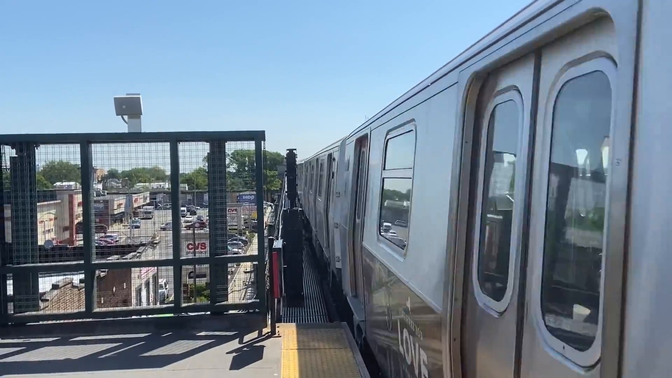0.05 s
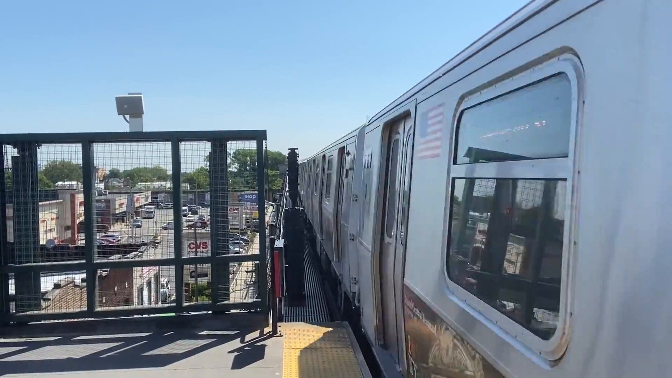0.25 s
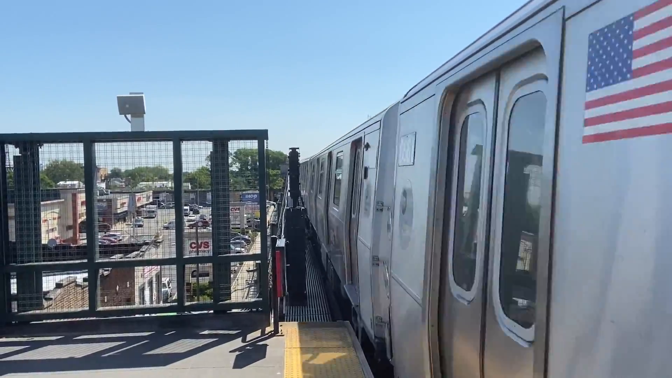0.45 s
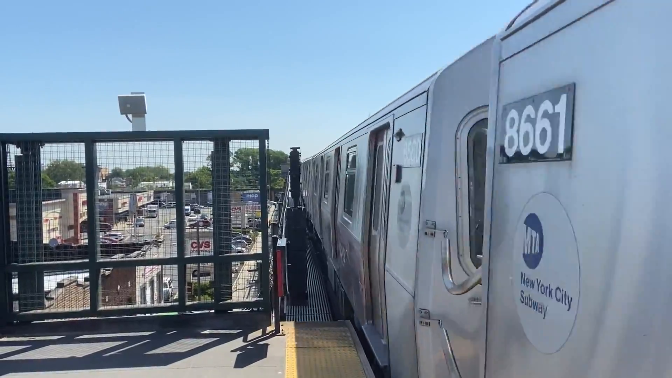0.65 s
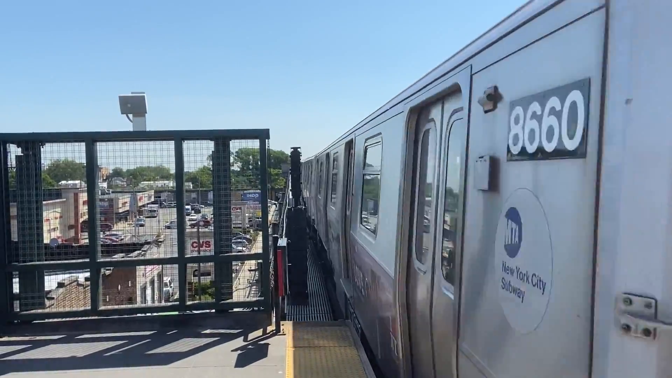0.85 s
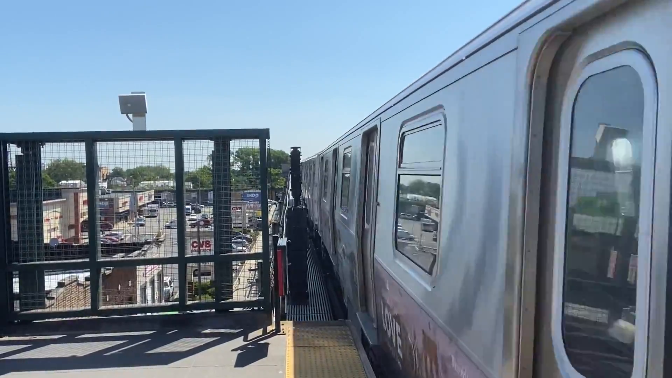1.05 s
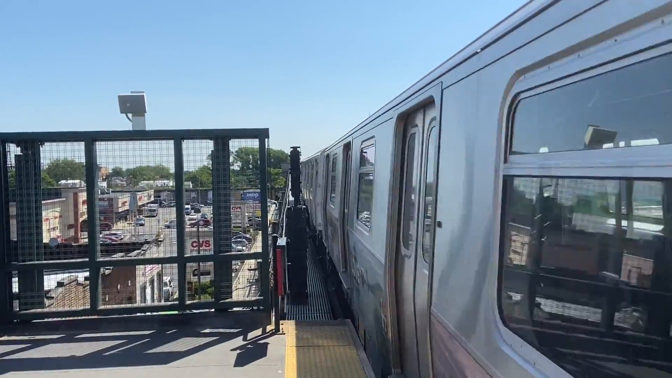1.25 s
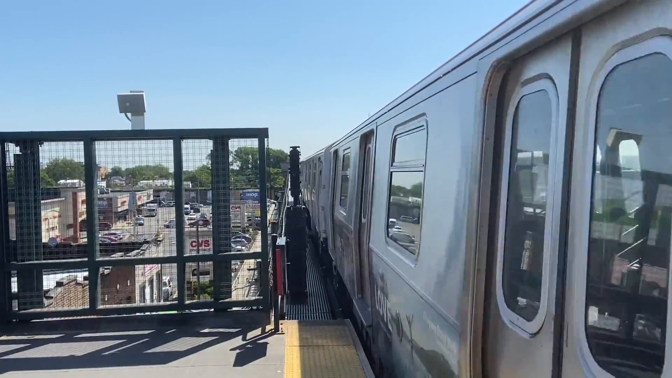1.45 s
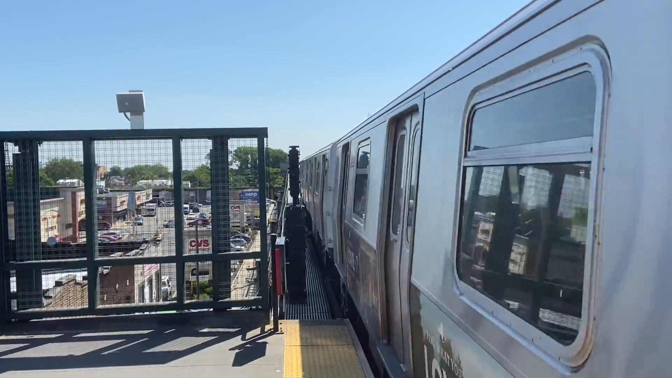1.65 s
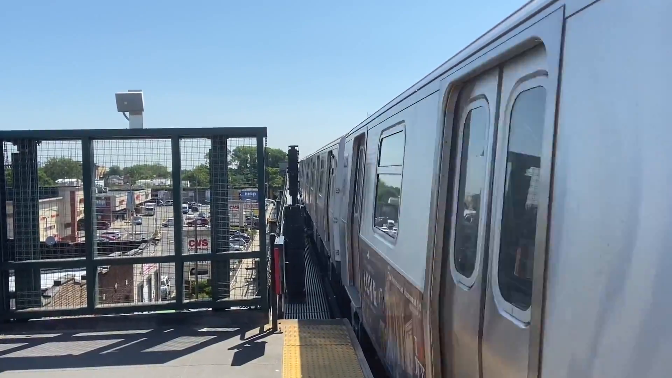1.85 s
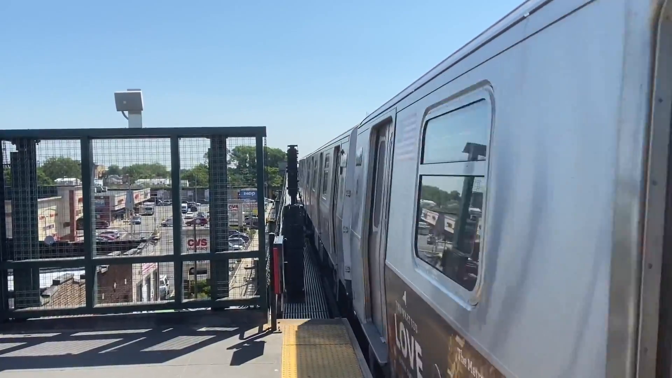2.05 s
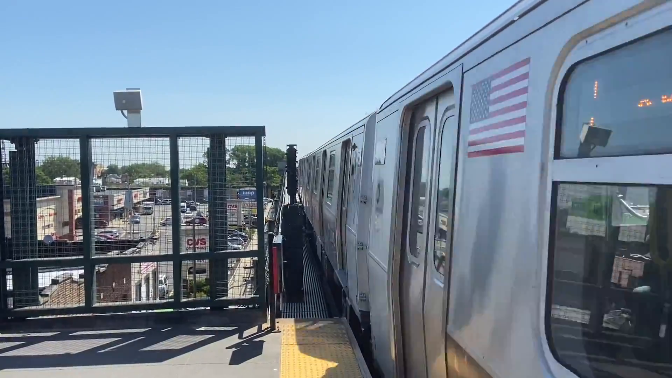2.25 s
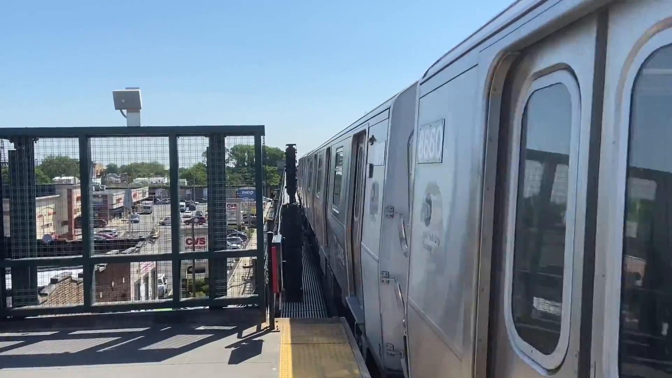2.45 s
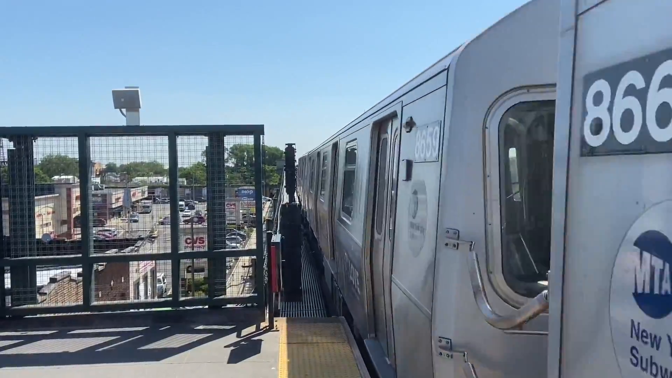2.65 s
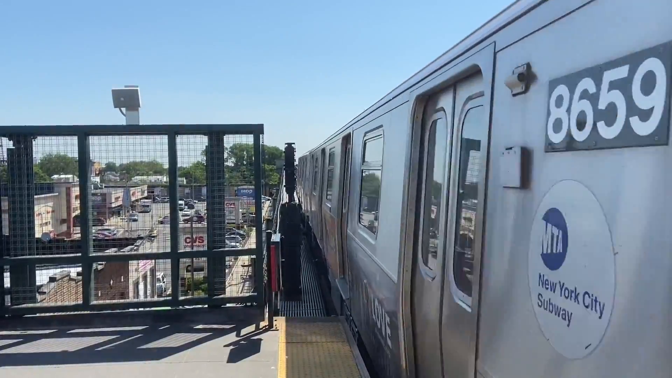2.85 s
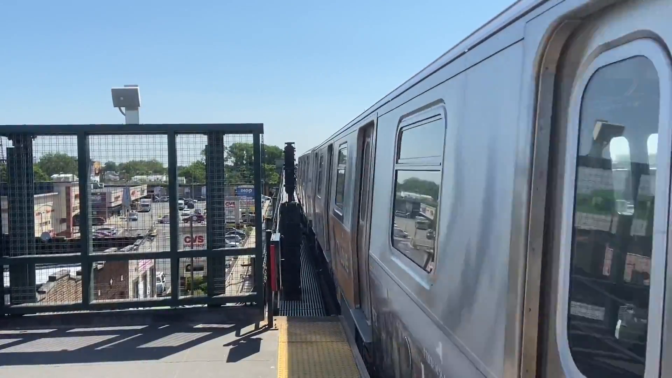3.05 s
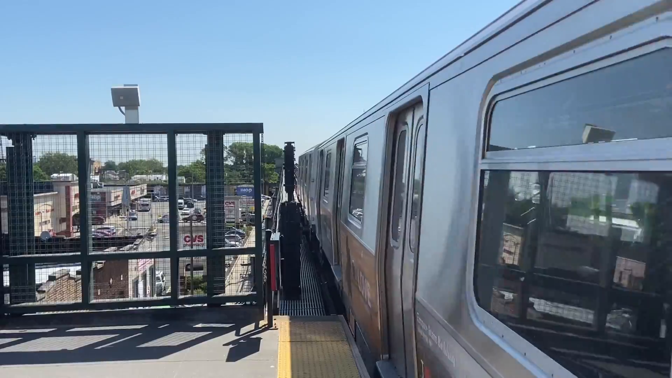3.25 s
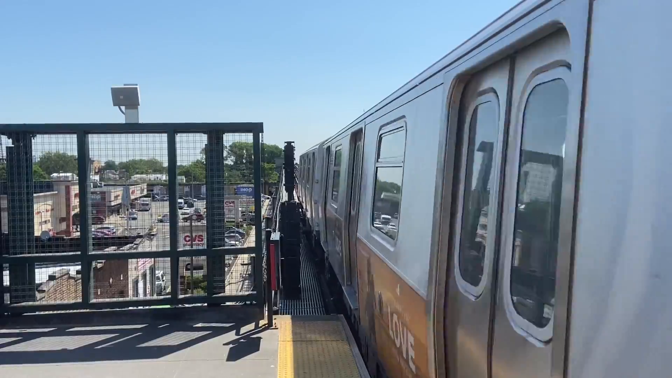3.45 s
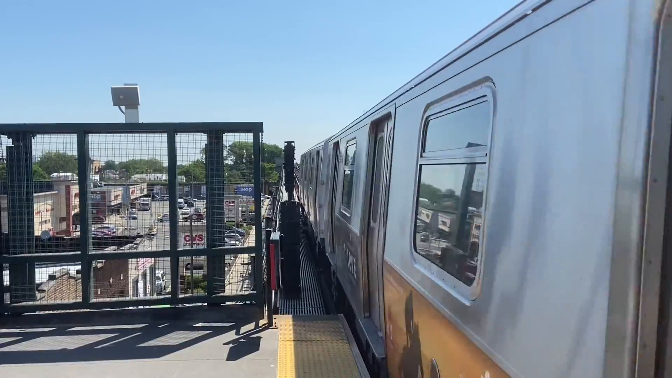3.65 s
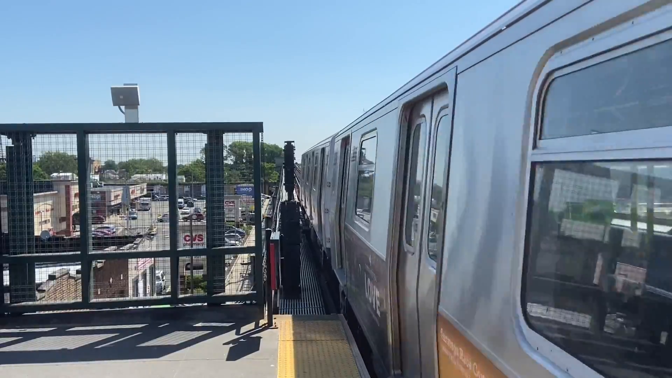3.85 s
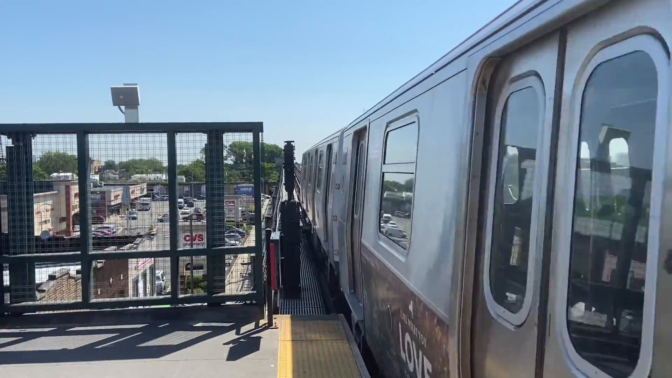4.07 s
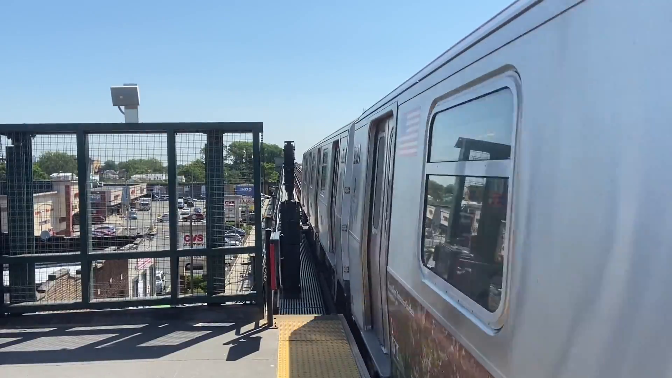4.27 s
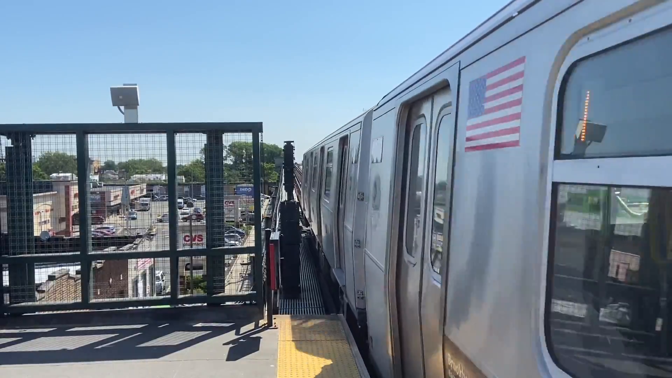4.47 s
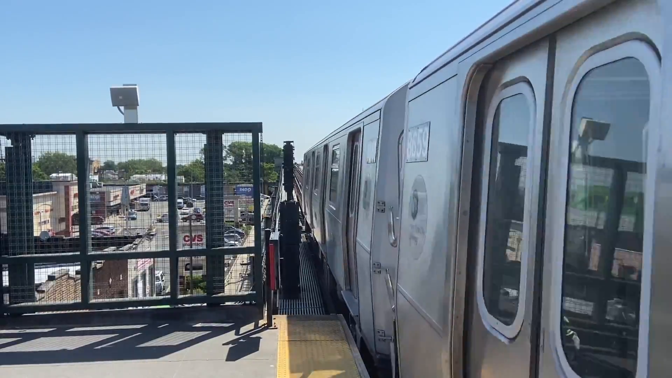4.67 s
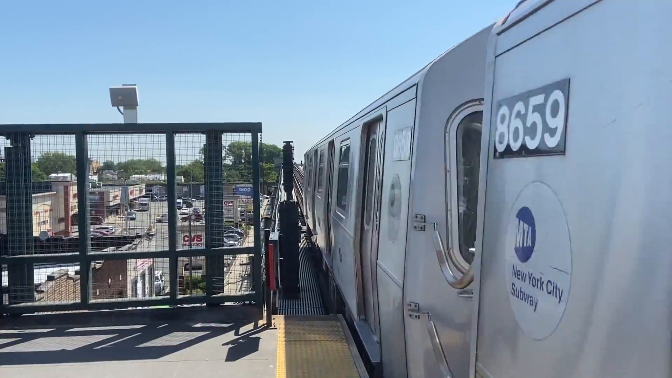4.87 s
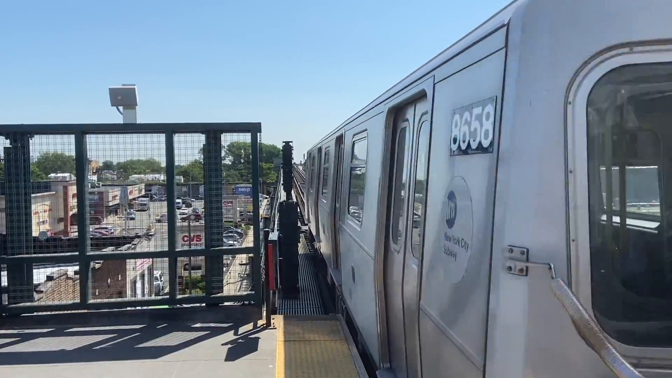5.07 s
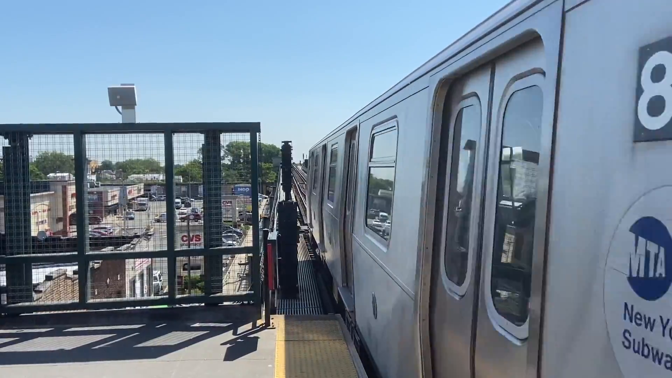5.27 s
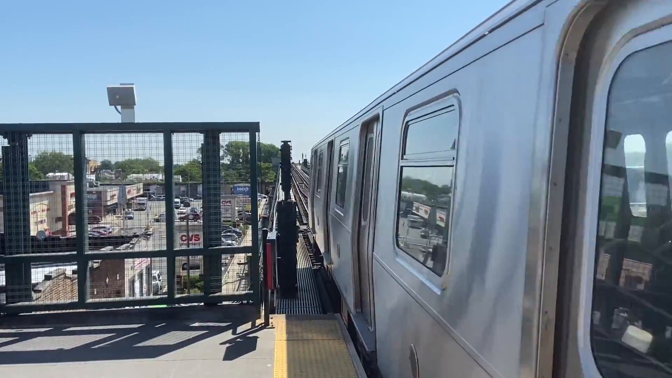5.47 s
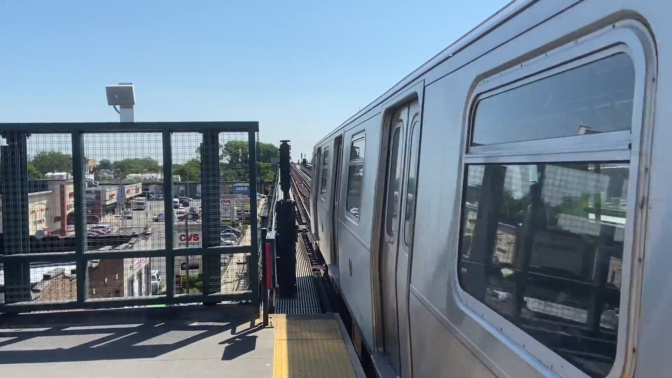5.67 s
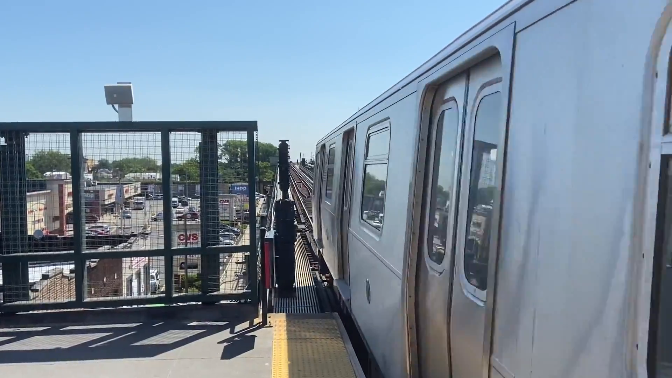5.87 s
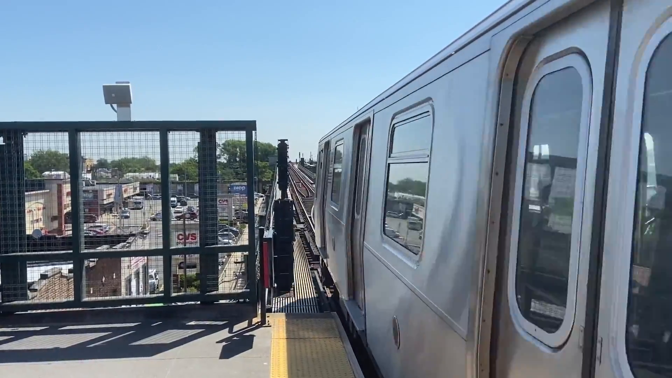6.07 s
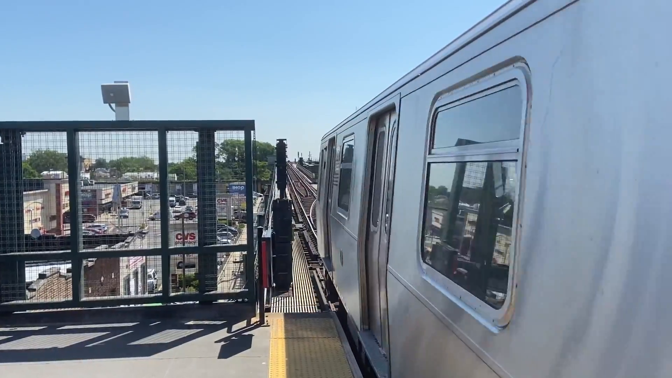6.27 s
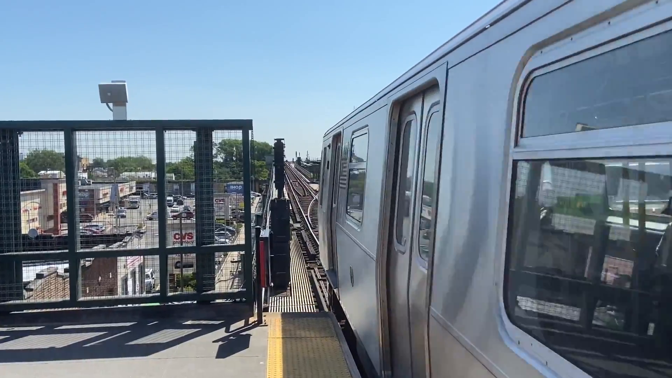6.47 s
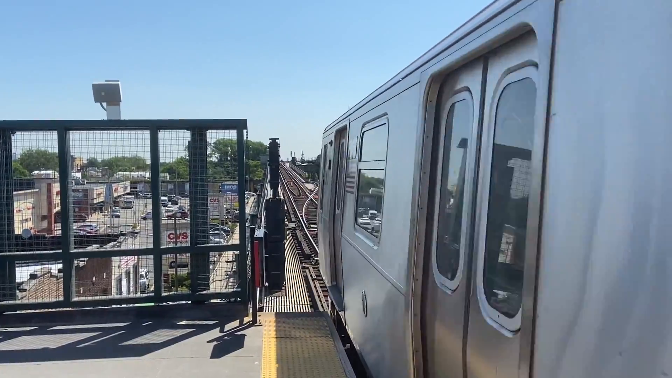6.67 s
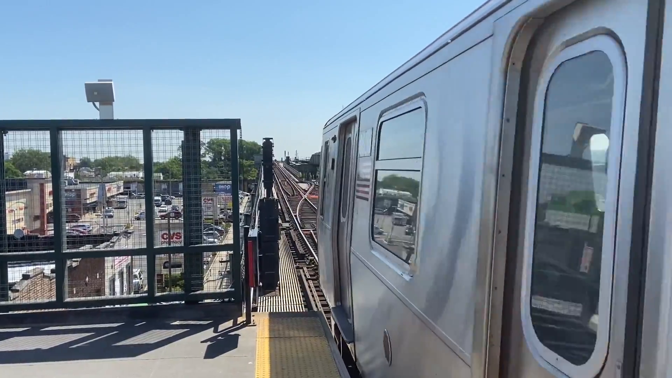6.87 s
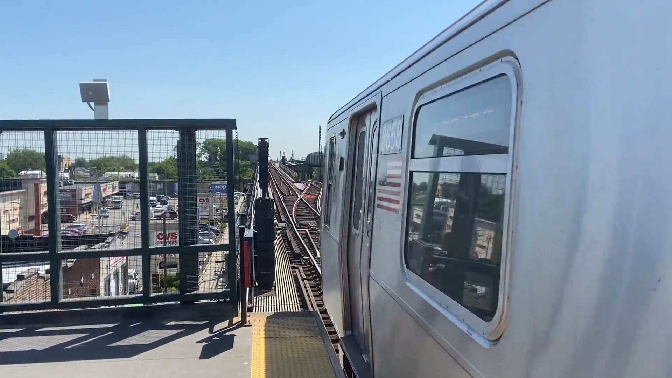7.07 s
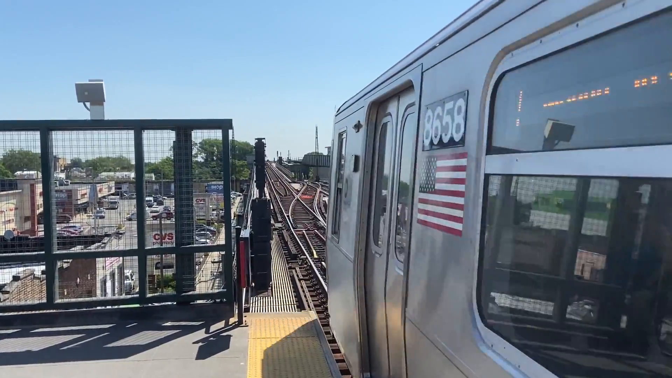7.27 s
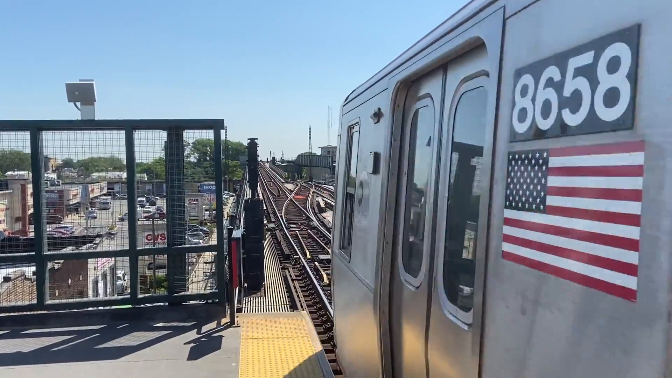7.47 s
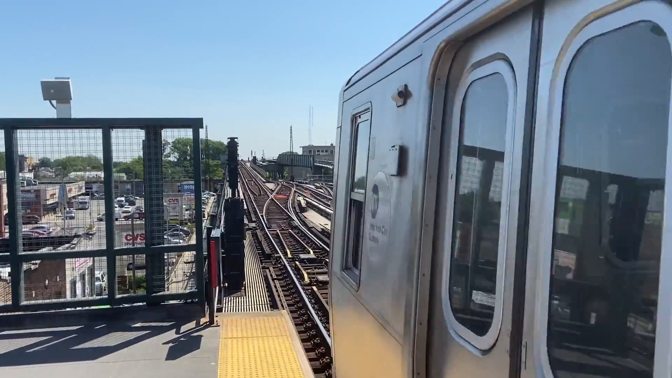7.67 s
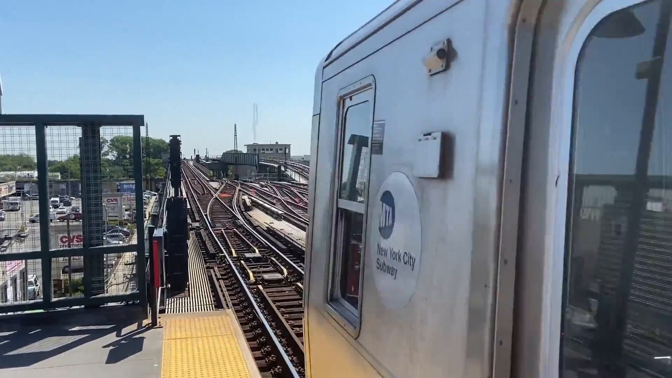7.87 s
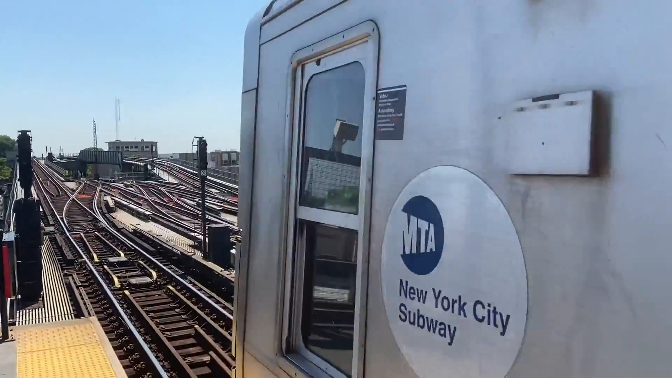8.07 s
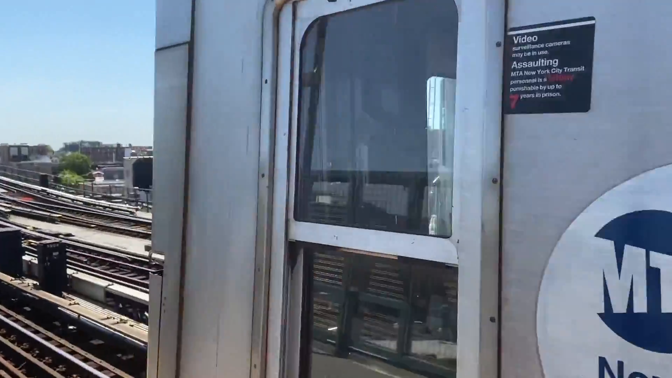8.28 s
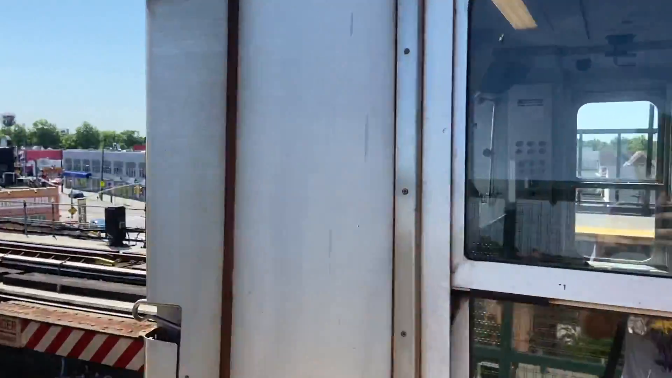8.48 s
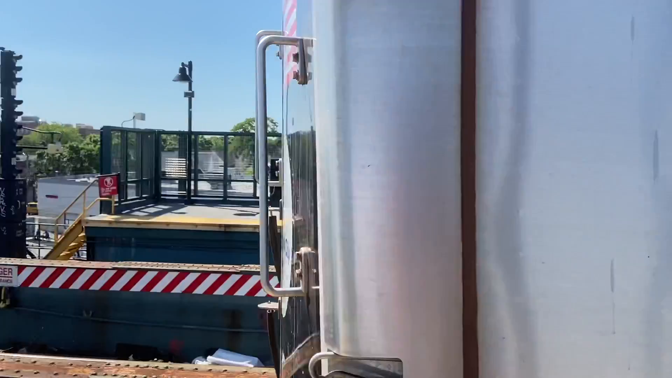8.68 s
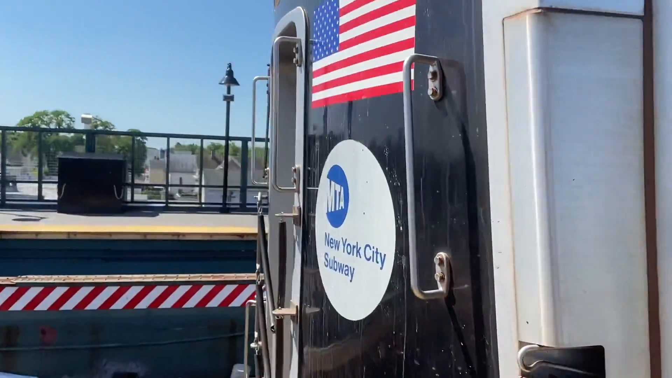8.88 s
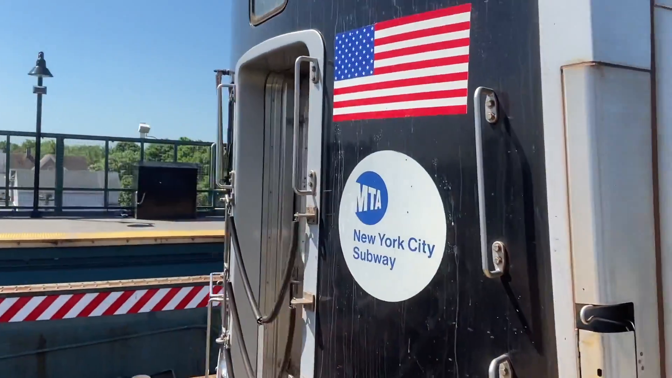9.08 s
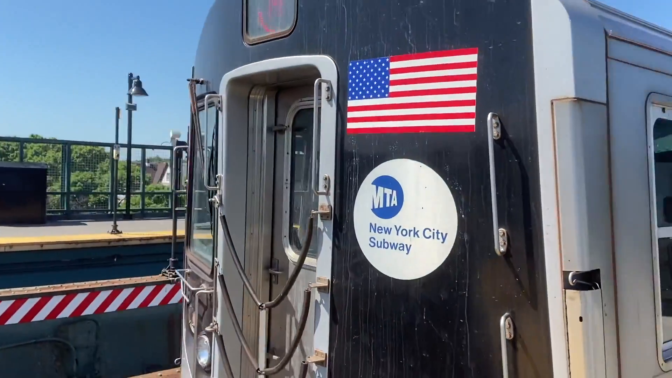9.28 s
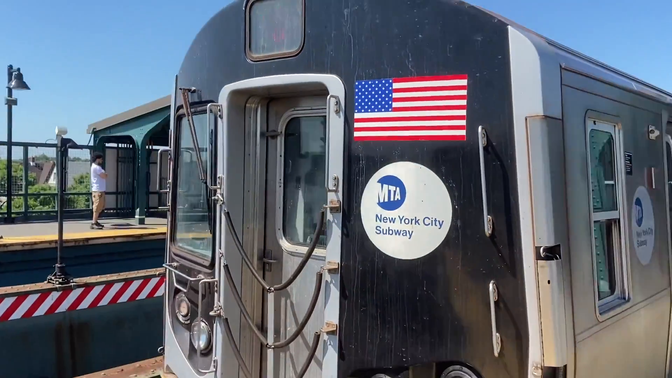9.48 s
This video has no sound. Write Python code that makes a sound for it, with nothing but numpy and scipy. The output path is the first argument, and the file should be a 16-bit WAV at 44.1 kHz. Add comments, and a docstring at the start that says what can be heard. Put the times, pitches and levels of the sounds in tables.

```python
"""Axles bang over rail joints again and again while wheels rumble, roar and hiss throughout:
an electric train slows into an elevated station, heard from the platform edge.
Rolling and blows are noise shaped by resonances and decays; each blow also strikes freely ringing modes.
The traction converters whine in narrow noise bands as one car after another passes, a slowing gear mesh adds
a falling sine late on, and flanges scrape now and then."""
import sys
import numpy as np
from scipy import signal
from scipy.fft import rfft, irfft, next_fast_len
from scipy.io import wavfile
from scipy.ndimage import uniform_filter1d, map_coordinates

SR = 44100
rng = np.random.default_rng(int(sys.argv[2]) if len(sys.argv) > 2 else 0)


def dump_mix(stems):
    """Bounce the given channels to the path in sys.argv[1] as a 16-bit WAV at rate SR."""
    frames = np.atleast_2d(stems).T  # one column per channel
    limited = np.clip(frames, -1, 1)  # hard clip at full scale
    pcm = np.round(limited * 32767).astype(np.int16)
    wavfile.write(sys.argv[1], SR, pcm)


N = 420254

# Axle blows at rail joints: (time [s], strength [dB], girder re strength [dB], sizzle re strength [dB],
# decay time factor [1]; clear blows add upper note [Hz], lower note [Hz])
JOINT_BLOWS = [(0.0193, -19, 3, -16.5, 0.71), (0.1828, -20, 1, -10, 1),
               (0.32, -12.5, 0, -13.5, 1, 624, 436), (0.4844, -21, 7.5, -19, 0.89),
               (0.525, -16, 3.5, -16, 0.89, 947, 425), (0.6766, -19.5, -4, -18, 0.84),
               (0.7902, -10.5, 2, -10, 0.66, 643, 480), (0.997, -13, 1.5, -12, 0.72, 600, 404),
               (1.378, -28, -4, -11, 1), (1.5219, -18, -5, -10.5, 0.6), (1.739, -20.5, -2, -8.5, 0.66),
               (1.8452, -21, 3, -15.5, 1), (2.0308, -20.5, -2, -10.5, 1),
               (2.1924, -10, -2.5, -13.5, 1, 1030, 441), (2.375, -19.5, 4, -19, 0.7),
               (2.4221, -15, 3, -16, 1, 692, 428), (2.603, -19, -3.5, -18, 0.77),
               (2.7304, -9, -1.5, -9.5, 0.86, 659, 501), (2.966, -13.5, 3, -13, 0.8, 977, 406),
               (3.418, -30, -1, -16, 1), (3.5796, -19, -7, -10.5, 0.61), (3.753, -28, 4, -20, 1),
               (3.8371, -20, 3.5, -10, 0.48), (3.959, -20.5, -2.5, -16, 1), (4.1885, -22, 3, -7.5, 0.83),
               (4.24, -18, 1, -25, 0.47), (4.3774, -9.5, -0.5, -14, 0.88, 619, 458),
               (4.5926, -20, 4, -21, 0.65), (4.6543, -13.5, 3, -12.5, 0.85, 966, 428),
               (4.878, -21.5, -3, -16, 0.8), (5.0367, -7, -4.5, -10, 0.62, 649, 433),
               (5.23, -24.5, -7, -26, 0.53), (5.3357, -12, -1, -14.5, 0.93, 649, 339),
               (5.5994, -28, 1, -21, 0.76), (5.9204, -27, -10, -13.5, 1), (6.1304, -19.5, -2, -11.5, 0.51),
               (6.374, -30, 4, -19, 1), (6.4783, -24.5, 5, -16, 0.48),
               (6.654, -21.5, 0.5, -20, 1, 799, 423), (6.7695, -25, -9.5, -16, 0.65),
               (6.9262, -30.5, -13, -13, 1), (7.0335, -24.5, -2, -17, 1),
               (7.253, -11.5, -2.5, -16.5, 0.96, 643, 336), (7.6694, -13, -1, -13.5, 0.99, 1020, 334),
               (9.2021, -22, 2.5, -12.5, 0.53, 896, 495), (9.237, -22.5, -9, -11, 0.43)]
# Rolling levels before offsets and sway: (time [s], viaduct rumble [dB], wheel roar [dB], rail hiss [dB])
ROLLING_LEVELS = [(0.0, -26.5, -24.5, -37.5), (0.5, -22, -26, -35), (0.95, -27, -24, -34.5),
                  (1.3, -25.5, -26, -40), (2.1, -25.5, -24, -36), (2.5, -22, -31.5, -42),
                  (2.95, -28.5, -23.5, -34.5), (3.32, -28, -28.5, -43.5), (4.14, -25.5, -29.5, -41),
                  (4.7, -27.5, -28.5, -40.5), (5.33, -33.5, -27.5, -39), (5.73, -28.5, -30, -45),
                  (6.24, -29, -35, -46.5), (6.7, -26.5, -36.5, -49), (7.1, -28.5, -34, -46),
                  (7.48, -32, -37, -45.5), (7.95, -32.5, -36.5, -50), (8.25, -34.5, -35.5, -49),
                  (8.65, -33, -37, -50), (8.9, -32, -32.5, -46.5), (9.53, -33.5, -34.5, -45)]
# Main converter whine before the left-right balance: (time [s], level [dB])
WHINE_LEVEL = [(0.0, -60), (0.3, -44), (1.0, -45), (1.2, -51), (1.5, -56), (2.2, -47), (2.85, -37.5),
               (3.15, -45), (3.35, -45.5), (3.9, -50), (4.06, -51), (4.11, -42), (4.6, -46), (5.0, -44),
               (5.17, -46), (5.27, -38), (5.45, -44), (5.75, -42), (6.1, -46.5), (6.45, -43.5),
               (6.77, -48.5), (7.0, -38.5), (7.2, -43.5), (7.45, -43), (7.63, -40), (7.8, -42), (7.86, -46),
               (8.0, -43.5), (8.13, -46), (8.3, -43), (8.9, -43.5), (9.05, -43), (9.53, -40.5)]
# Noise spectra, of which only the shape counts: (frequency [Hz], density [dB per Hz])
RUMBLE_SPECTRUM = [(15, -62), (27, -29), (40, -6), (50, -3.5), (64, -2.5), (79, -1.5), (92, -6), (130, -11),
                   (250, -19.5), (600, -72)]
ROAR_SPECTRUM = [(60, -54.5), (150, 1.5), (250, -0.5), (330, 1.5), (450, -2), (650, -6), (1000, -10.5),
                 (1600, -23), (2500, -23.5), (6000, -73)]
HISS_SPECTRUM = [(700, -32), (1500, 1.5), (2500, 3), (4000, -0.5), (6000, -11), (8000, -15), (11000, -21.5),
                 (16000, -39)]
CLANG_SPECTRUM = [(300, -27), (620, 9), (790, 1), (1000, 4), (1400, -3.5), (1630, -9), (1900, -3),
                  (2500, -0.5), (3300, -5), (3800, -11), (5000, -22), (9000, -35)]
SIZZLE_SPECTRUM = [(2000, -42), (3800, -6), (4400, 1), (5200, -2), (6000, -8), (8000, -7.5), (11000, -9.5),
                   (14000, -17), (16000, -29)]
STREET_SPECTRUM = [(500, -49), (1000, 2), (2000, -12), (4500, -26), (7500, -17.5), (9300, -26),
                   (11500, -22.5), (16000, -30)]
# Resonances of girders, wheels and rubbing flanges: (frequency [Hz], width [Hz], relative level [dB])
GIRDER_MODES = [(263.5, 100, 1), (332.3, 24.5, -1), (445.6, 120, 3.3), (643, 95, -16)]
WHEEL_MODES = [(867, 40, -5.5), (1011, 66, -2), (1293, 310, -4), (1490, 60, -9), (1700, 50, -10),
               (1880, 70, -8), (2300, 50, -8), (2473, 70, -4), (2810, 220, -14), (3300, 90, -10),
               (4170, 230, -14), (4760, 210, -16)]
FLANGE_MODES = [(960, 200, 2), (2250, 300, -3), (3340, 200, -4), (3850, 250, -7), (4290, 140, -4),
                (4720, 120, -2), (6500, 400, -15)]
# Left-right likeness of the blows, and of sound from all around: (frequency [Hz], likeness [0-1])
LIKENESS_BLOWS = [(60, .985), (170, 0.95), (500, 0.85), (1200, 0.75), (2200, 0.35), (3600, 0.32),
                  (5600, 0.22), (6900, 0.85), (8700, 1), (16000, 0.88)]
LIKENESS_AROUND = [(60, .985), (200, 0.9), (400, .63), (650, 0.42), (1000, .25), (1600, .05), (2200, .3),
                   (3500, 0.17), (5600, .2), (6900, 0.83), (8700, 1), (16000, 0.81)]
# Level of left against right: (frequency [Hz], difference [dB])
LEFT_RIGHT_LEVEL = [(60, 0.5), (500, -0.6), (1200, -2), (1800, 0), (3000, 4), (4200, 1), (5800, 2),
                    (7200, -0.5), (16000, -0.5)]
# Phase by which left leads right: (frequency [Hz], lead [rad])
LEFT_RIGHT_PHASE = [(90, 0), (200, -.1), (400, -0.22), (650, -0.55), (1000, -0.43), (1600, -.3),
                    (2200, -.5), (3200, .4), (5000, -0.076)]
# Bands between which the whine steps: (start [s], end [s], centre [Hz], width [Hz])
WHINE_BANDS = [(-.1, 2.6, 2493, 196), (.7, 1.2, 2880, 190), (2.5, 4.0, 2885, 250), (4.0, 6.25, 2495, 180),
               (6.2, 7.83, 2875, 160), (7.82, 9.8, 2560, 120)]
# Fainter whines, low drones, high hisses and a short squeak:
# (start [s], end [s], centre [Hz], width [Hz], level before fades and balance [dB])
PARTIALS = [(4.9, 6.1, 7420, 220, -67), (7.9, 8.65, 640, 30, -49), (7.98, 8.11, 1890, 20, -54),
            (7.9, 10.5, 3850, 120, -62), (8.0, 11, 5120, 200, -61), (8.8, 11, 5120, 200, -62),
            (8.5, 11.5, 7665, 60, -67), (8.85, 11.5, 7665, 60, -62), (8.7, 11, 4500, 2400, -58),
            (8.8, 10.5, 8950, 200, -69), (7.6, 8.9, 10270, 120, -72), (7.7, 8.75, 9200, 1500, -62),
            (3.415, 3.475, 4670, 60, -46), (9.25, 10, 3350, 90, -58), (8.75, 10.3, 980, 300, -51),
            (2.25, 2.7, 340, 25, -33), (4.48, 4.62, 335, 20, -34), (4.68, 4.95, 335, 20, -33),
            (5.22, 5.52, 335, 20, -33), (6.35, 6.54, 990, 220, -43), (5.05, 5.2, 870, 50, -39)]
# Slowing gear mesh before jitter and balance: (time [s], frequency [Hz], peak level [dB])
GEAR_MESH = [(0, 3200, -90), (7.75, 3200, -90), (7.9, 3130, -62), (8.6, 3070, -63), (9.53, 2970, -64)]
# Flanges rubbing a switch rail: (start [s], end [s], level [dB])
SCRAPES = [(1.375, 1.48, -41.5), (3.415, 3.55, -39.5), (3.75, 3.84, -44), (4.0, 4.13, -43),
           (6.37, 6.55, -44), (6.72, 6.88, -44), (9.2, 9.29, -37)]

TOP_HZ = 15900
LEFT_LAG_S, LAG_FROM_HZ = .000243, 7050  # treble reaches the left later
NEAR_DB, FAR_SPAN_DB = -9.5, 23  # a blow this strong is close by; this much fainter is fully far
CLANG_DB, BOOM_DB = -2, -6  # against the strength of a near blow
BOOM_FAR_DB = 9  # the boom carries better from far joints
RISE_S, RISE_FAR_S = 0.0038, 0.026  # near blows strike sharply; the second is added to far ones
PAN_DB, PAN_FAR_DB = 0.26, -1  # left up and right down by this: near joint, farthest joints
WHINE_STEP_S = 0.019
STEADY = .05  # at 0 a whine beats like noise, at 1 it holds its level
REBOUND_S, REBOUND_DB = .03, -4.5  # mean wait between the knocks of one blow, level of the later ones
NOTE_DB, NOTE_T60_S = (-4, -1), (.13, .17)  # upper and lower note: against blow strength, decay time


def amp(db):
    """Level and amplitude: decibels to linear gain."""
    return 10 ** (np.asarray(db) / 20)


def unit(x):
    """Normalisation: scaled to rms 1."""
    return x / np.sqrt(np.mean(x ** 2) + 1e-20)


def along(points, hz):
    """Logarithmic frequency axis: interpolation of (Hz, value) points."""
    f, v = np.transpose(points)
    return np.interp(np.log(hz + 1), np.log(f + 1), v)


def curves(rows):
    """Linear interpolation in time: one value per sample for each column after the first."""
    s, *columns = np.transpose(rows)
    return [np.interp(np.arange(N) / SR, s, column) for column in columns]


def wobble(rate):
    """Slow random modulation: a smooth curve through rate random knots a second."""
    knots = rng.standard_normal(int(N * rate / SR) + 4)
    return map_coordinates(knots, [np.arange(N) * rate / SR])


def fade_in_out(t, start, end, rise_s, fall_s):
    """Linear onset and release: gain from 0 to 1 and back between start and end."""
    return np.clip(np.minimum((t - start) / rise_s, (end - t) / fall_s), 0, 1)


def filtered(x, response):
    """Linear filtering: the spectrum of x times a complex response of frequency."""
    m = next_fast_len(N + SR // 2)
    return irfft(rfft(x, m) * response(np.fft.rfftfreq(m, 1 / SR)), m)[..., :N]


def causal(gain):
    """Causality: the minimum-phase response with this gain, so nothing sounds before a blow."""
    cepstrum = irfft(np.log(gain + 1e-6))
    half = len(cepstrum) // 2
    cepstrum[1:half] *= 2
    cepstrum[half + 1:] = 0
    return np.exp(rfft(cepstrum))


def shaken(envelope, gain, patchy_db):
    """Random excitation: two unrelated noises with time-frequency patches of gain, enveloped, then coloured."""
    z = signal.stft(rng.standard_normal((2, N)), nperseg=512)[2]
    field = uniform_filter1d(rng.standard_normal(z.shape[1:]), size=3, axis=0)
    field = uniform_filter1d(field, size=5, axis=1)
    patches = amp(patchy_db * unit(field))
    noise = unit(signal.istft(z * patches, nperseg=512)[1][:, :N])
    return filtered(envelope * noise, lambda hz: causal(unit(gain(hz))))  # the colour passes rms 1


def table(spectrum):
    """Spectral shaping: a gain function from (Hz, dB) points."""
    return lambda hz: amp(along(spectrum, hz))


def modes(rows, hz):
    """Modal resonance: the summed power of (Hz, width Hz, dB) resonators, as a gain."""
    power = 0
    for centre, width, db in rows:
        damping = (hz * width) ** 2
        power = power + amp(db) ** 2 * damping / ((centre * centre - hz * hz) ** 2 + damping)
    return np.sqrt(power)


def band(centre_hz, width_hz):
    """Narrow-band noise: rms 1, flat-topped, its level fluctuations slightly evened out."""
    noise = filtered(rng.standard_normal(N), lambda hz: 1 / (1 + (2 * (hz - centre_hz) / width_hz) ** 4))
    envelope = np.abs(signal.hilbert(noise, next_fast_len(N))[:N])
    return unit(noise / envelope ** STEADY)


def ports(pair, alike):
    """Interaural coherence: a shared mid and opposed side set likeness; left and right differ in level and phase."""
    def mix(hz):
        turn = np.arccos(np.clip(along(alike, hz), 0, 1)) / 2
        return np.array([np.cos(turn), np.sin(turn)])

    def tilt(hz):  # half the difference for the left, its inverse for the right
        lag = np.pi * LEFT_LAG_S * np.maximum(hz - LAG_FROM_HZ, 0)
        return amp(along(LEFT_RIGHT_LEVEL, hz) / 2) * np.exp(.5j * along(LEFT_RIGHT_PHASE, hz) - 1j * lag)

    mid, side = filtered(pair, mix)
    return filtered(np.array([mid + side, mid - side]), lambda hz: np.array([tilt(hz), 1 / tilt(hz)]))


def rolling():
    """Roughness excitation: wheels on rail rumble, roar and hiss, partly together, over a steady street hiss."""
    rumble_db, roar_db, hiss_db = curves(ROLLING_LEVELS)
    sway = wobble(7.7)  # shared by roar and hiss
    rumble = shaken(amp(rumble_db + 0.29 * wobble(6.6)), table(RUMBLE_SPECTRUM), patchy_db=0.8)
    roar = shaken(amp(roar_db - 1 + .9 * sway + .9 * wobble(25)), table(ROAR_SPECTRUM), patchy_db=1.9)
    hiss = shaken(amp(hiss_db - 1.2 + 1.3 * sway + .5 * wobble(33)), table(HISS_SPECTRUM), patchy_db=2.2)
    # the girders answer in surges
    hum_level = amp(roar_db - 8 + 3.4 * wobble(6.5))
    hum = shaken(hum_level, lambda hz: modes(GIRDER_MODES, hz) ** 2, patchy_db=3.5)
    # loose parts ring the wheels
    chatter_level = amp(hiss_db - 7 + 3.6 * wobble(12) + 2.3 * wobble(70))
    chatter = shaken(chatter_level, lambda hz: modes(WHEEL_MODES, hz) ** 2, patchy_db=3.5)
    street = shaken(amp(-53.5), table(STREET_SPECTRUM), patchy_db=5.5)
    return rumble + roar + hiss + hum + chatter + street


def converters():
    """Switching and gear-mesh tones: whine in narrow bands, louder on the left, and a late faint gear sine."""
    whine_db, = curves(WHINE_LEVEL)
    t = np.arange(N) / SR
    whine = np.zeros(N)
    for start, end, hz, width_hz in WHINE_BANDS:
        whine += fade_in_out(t, start, end, WHINE_STEP_S, WHINE_STEP_S) * band(hz, width_hz)
    tone = amp(whine_db + .3 * wobble(9)) * whine
    for start, end, hz, width_hz, db in PARTIALS:
        on = (t > start) & (t < end)
        edge_s = min(.3 * (end - start), .2)
        fade = fade_in_out(t, start, end, edge_s, edge_s) * amp(wobble(8))
        tone[on] += amp(db) * fade[on] * unit(band(hz, width_hz)[on])
    gear_hz, gear_db = curves(GEAR_MESH)
    gear_phase = 2 * np.pi * np.cumsum(gear_hz + 20 * wobble(30)) / SR
    tone += amp(gear_db + 3 * wobble(20)) * np.sin(gear_phase)
    return amp([[2], [0]]) * ports(np.array([tone, np.zeros(N)]), LIKENESS_BLOWS)


def joints():
    """Impact and decay: a blow shakes viaduct, girders, wheel, rail and loose parts, each dying at its own speed."""
    t = np.arange(SR // 2) / SR
    power, pan_db = np.zeros((4, N + SR)), np.zeros(N + SR)
    # rows: clang, girder, boom, sizzle
    t60 = np.array([[.38], [.42], [.62], [.38]])
    slower = np.array([[0], [.006], [.015], [0]])  # heavy parts take longer to start swinging
    cracks = np.array([[1], [0], [0], [1]])
    echo = amp(-12.5 - 60 * t / 0.46) ** 2  # walls of the street answer
    for s, db, girder_db, sizzle_db, ring, *_ in JOINT_BLOWS:
        far = np.clip((NEAR_DB - db) / FAR_SPAN_DB, 0, 1)  # faint blows are far: blurred, with less crack
        start = round((s - .003 - 0.014 * far ** 2) * SR)  # the swell begins before the onset is heard
        span = slice(start, start + len(t))
        swell = (1 - np.exp(-t / (RISE_S + RISE_FAR_S * far ** 2 + slower))) ** 2
        crack = amp(3 - 4.3 * far - 60 * t / 0.029) ** 2 * cracks
        part_db = np.array([[CLANG_DB], [girder_db], [BOOM_DB + BOOM_FAR_DB * far], [sizzle_db]])
        decay = amp(-60 * t / (t60 * ring)) ** 2
        power[:, span] += amp(db + part_db) ** 2 * swell * (decay + crack + echo)
        pan_db[span] = PAN_DB + (PAN_FAR_DB - PAN_DB) * far ** 2
    clang, body, boom, sizzle = np.sqrt(power[:, :N])
    rattle = amp(1.6 * wobble(70) + 0.35 * wobble(300))  # loose fittings chatter after the blow
    bright = amp(-2.5) * shaken(clang * rattle, table(CLANG_SPECTRUM), patchy_db=4.0)
    bright += shaken(sizzle * rattle, table(SIZZLE_SPECTRUM), patchy_db=3.5)
    wheel_level = clang * amp(2.0 * wobble(50))
    bright += amp(-6.0) * shaken(wheel_level, lambda hz: modes(WHEEL_MODES, hz) * (hz < 6000), patchy_db=2.5)
    low = shaken(body, lambda hz: modes(GIRDER_MODES, hz), patchy_db=1.2)
    low += shaken(boom, table(RUMBLE_SPECTRUM), patchy_db=1.5)
    return bright, low, uniform_filter1d(pan_db[:N], size=400)


def knocks():
    """Free vibration: a blow and its rebounds ring girder and wheel modes at varied strength and pitch."""
    out, t = np.zeros(N + SR), np.arange(SR // 5) / SR
    hz, width_hz, level_db = np.transpose(GIRDER_MODES + WHEEL_MODES)[:, :, None]
    count = len(JOINT_BLOWS)
    chance = rng.standard_normal((count, 4, 3, len(hz), 1))  # four knocks a blow, three draws a mode
    waits = np.cumsum(rng.exponential(size=(count, 4)), axis=1) * REBOUND_S
    for (s, db, _, _, lasting, *_), strikes, wait in zip(JOINT_BLOWS, chance, waits):
        rise_s = .0018 + .0008 * max(NEAR_DB - 6 - db, 0)
        for (strength, detune, delay), later in zip(strikes, wait - wait[0]):
            since = np.maximum(t - .005 * np.abs(delay), 0)  # the shock reaches the parts one after another
            decay = np.exp(-.45 * np.pi * width_hz * since)
            ring = decay * np.sin(2 * np.pi * hz * (1 + 0.016 * detune) * since)
            knock_db = db - 8 + .45 * min(db + 21.0, 0)  # far blows lose their hard edge
            knock_db += (later > 0) * (REBOUND_DB - 6 * (hz < 550))  # rebounds stir low modes less
            knock_db -= 60 * later / (.55 * lasting)
            gain = amp(knock_db + level_db + 3.4 * strength) * (1 - np.exp(-since / rise_s))
            out[round((s + later) * SR):][:len(t)] += np.sum(gain * ring, axis=0)
    return np.array([out[:N], np.zeros(N)])


def notes():
    """Damped sinusoids: each clear blow carries two short notes of its own."""
    out, t = np.zeros(N + SR), np.arange(SR // 5) / SR
    for s, db, _, _, _, *pitch_hz in JOINT_BLOWS:
        for hz, level_db, t60 in zip(pitch_hz, NOTE_DB, NOTE_T60_S):
            envelope = amp(db + level_db - 60 * t / t60) * (1 - np.exp(-t / .006))
            out[round(s * SR):][:len(t)] += envelope * np.sin(2 * np.pi * hz * t)
    return np.array([out[:N], np.zeros(N)])


def scrapes():
    """Friction excitation: a rubbing flange sets in quickly, grates unevenly and fades."""
    t = np.arange(N) / SR
    rub = sum(amp(db) * fade_in_out(t, start, end, .02, .07) for start, end, db in SCRAPES)
    return shaken(rub * amp(1.5 * wobble(60)), lambda hz: modes(FLANGE_MODES, hz), patchy_db=2.5)


def scene():
    """Superposition: the sounds of the train on the viaduct add up in left and right."""
    around = ports(rolling(), LIKENESS_AROUND)
    whine = converters()
    bright, low, pan_db = joints()
    low_blows = ports(low + knocks() + notes(), LIKENESS_BLOWS)
    bright_blows = ports(bright + scrapes(), LIKENESS_BLOWS) * amp([pan_db, -pan_db])
    return around + whine + low_blows + bright_blows


def record(dry):
    """Saturation and band limit: the loudest blows are softly clipped, then the top is cut off."""
    soft = dry / (1 + np.abs(dry / .95) ** 5) ** (1 / 5)
    return filtered(soft, lambda hz: hz < TOP_HZ)


dry = scene()
out = record(dry)
dump_mix(out)
```